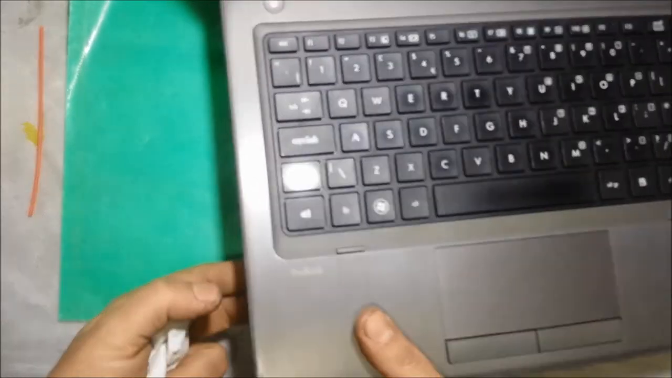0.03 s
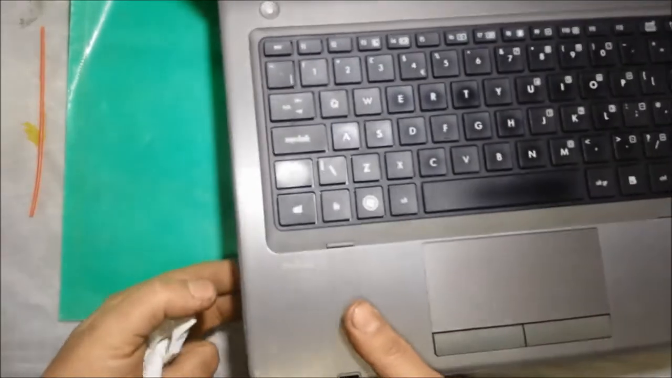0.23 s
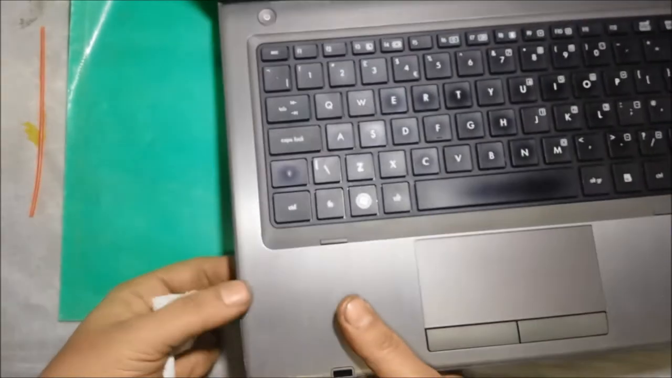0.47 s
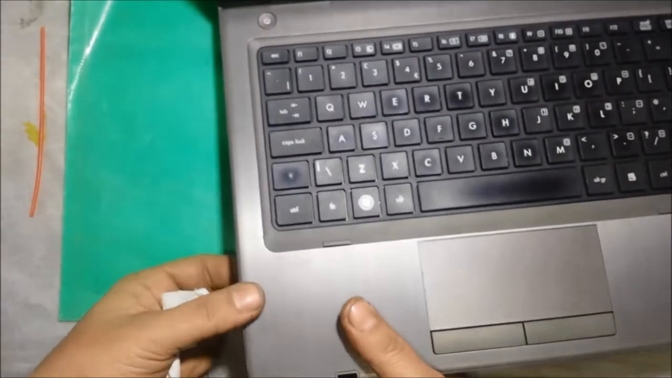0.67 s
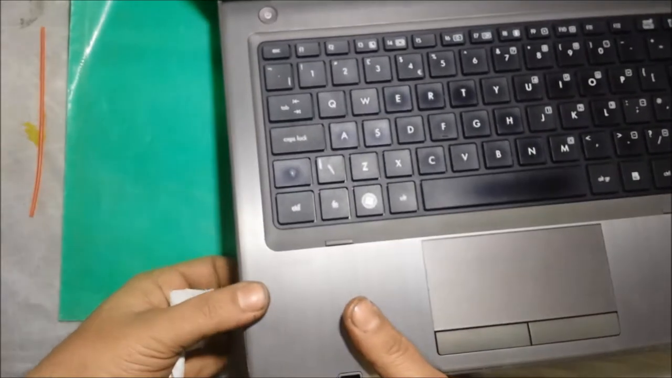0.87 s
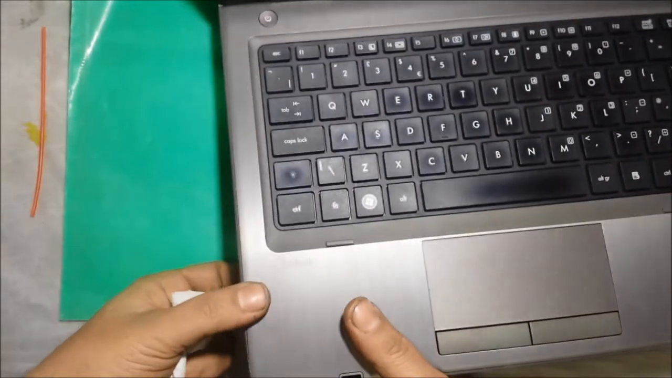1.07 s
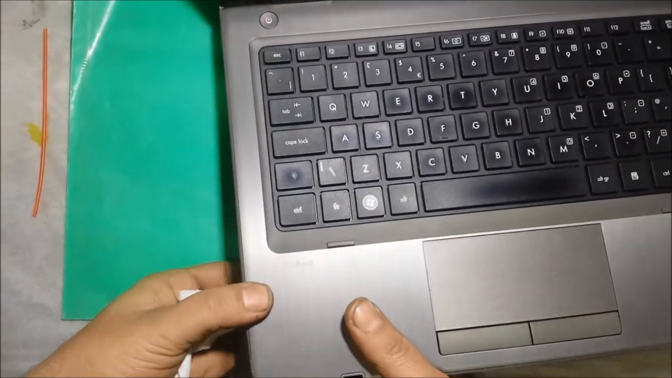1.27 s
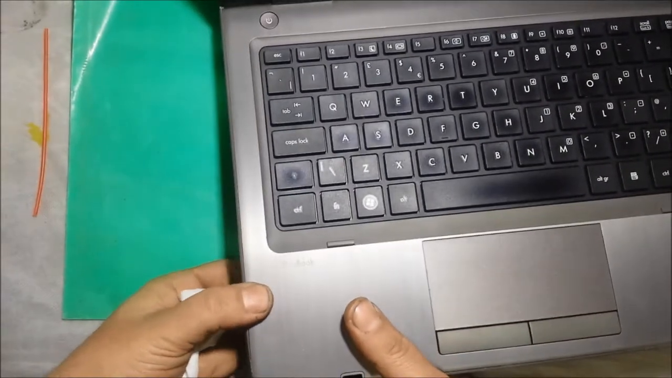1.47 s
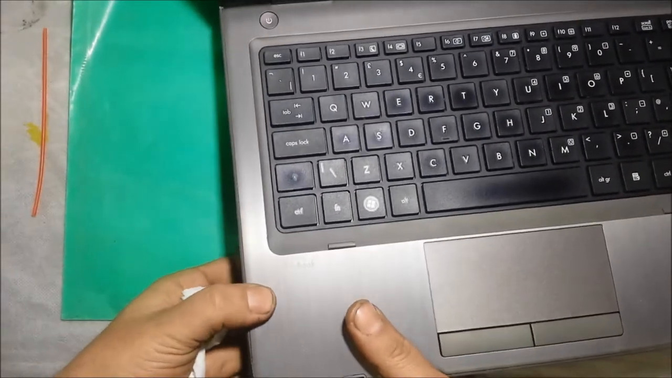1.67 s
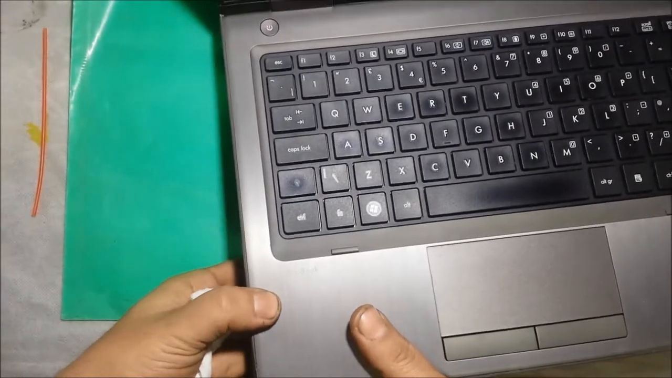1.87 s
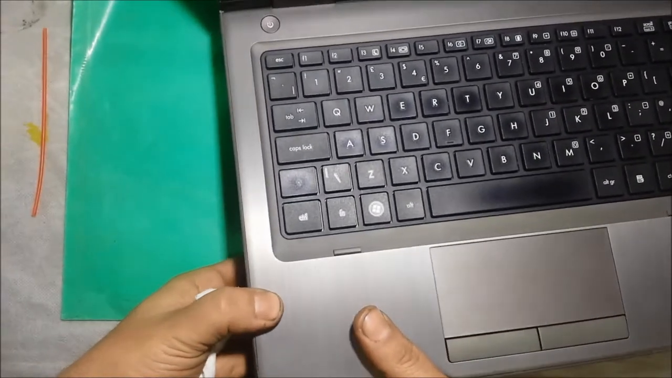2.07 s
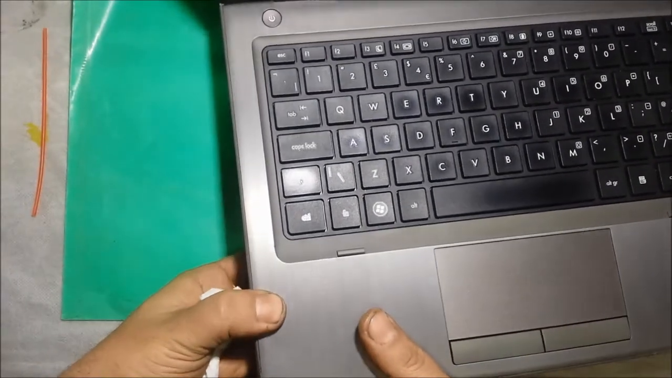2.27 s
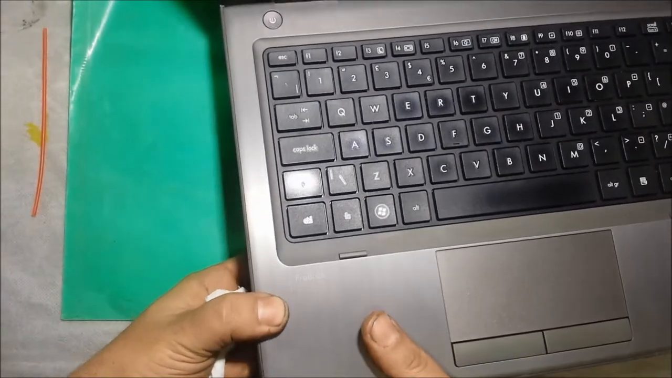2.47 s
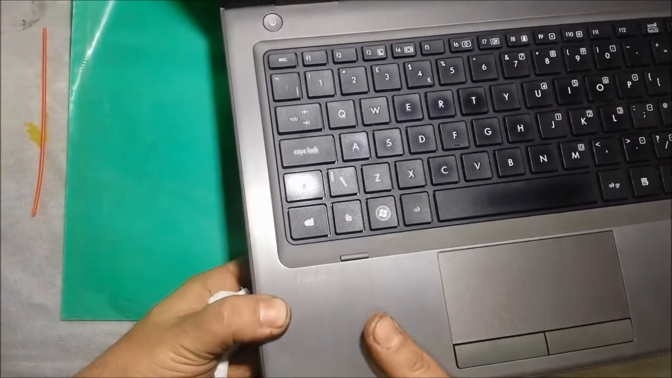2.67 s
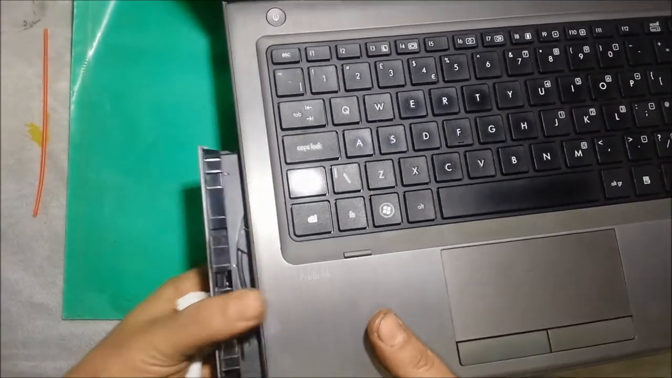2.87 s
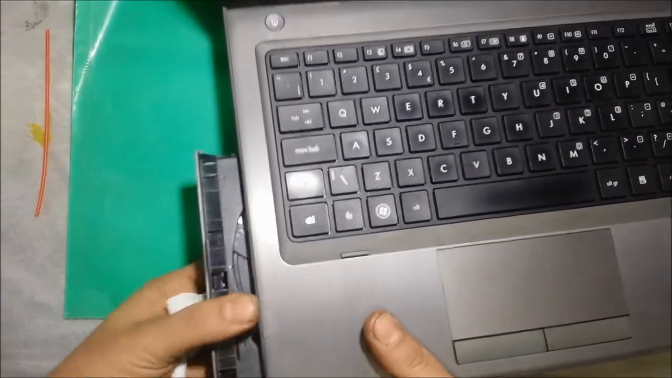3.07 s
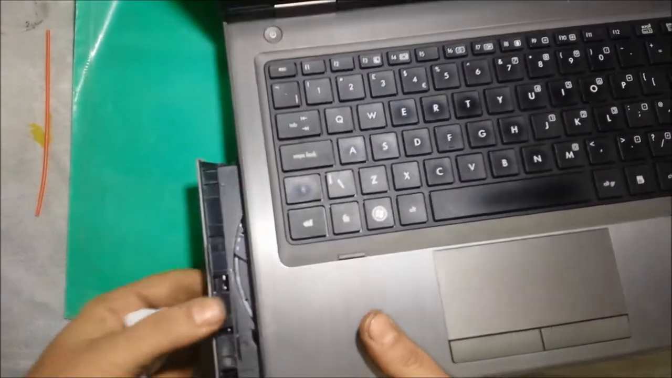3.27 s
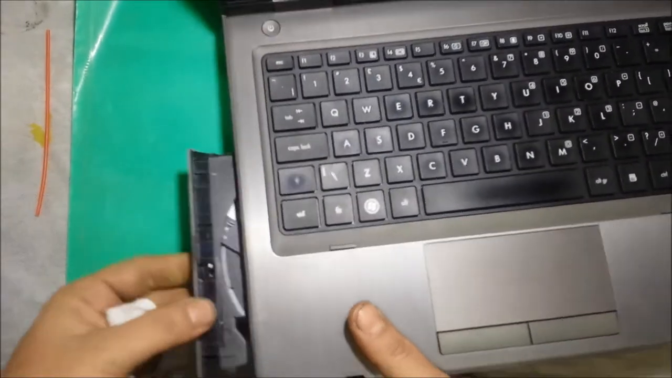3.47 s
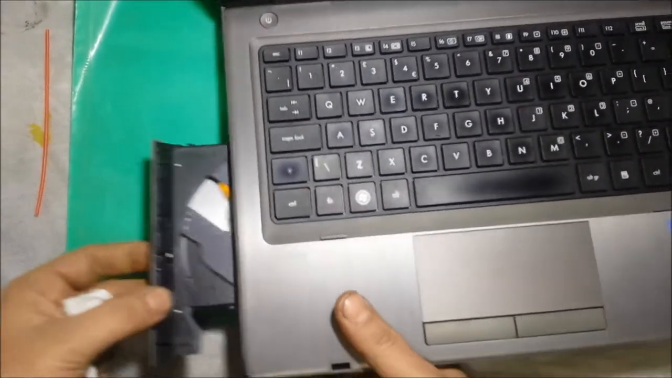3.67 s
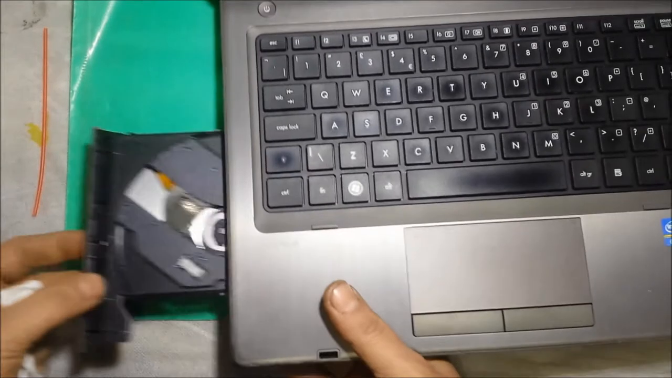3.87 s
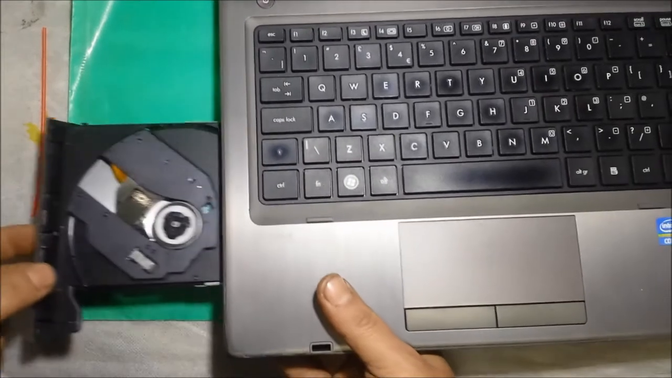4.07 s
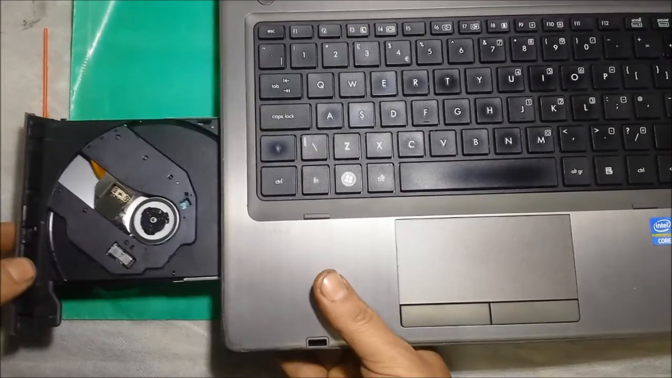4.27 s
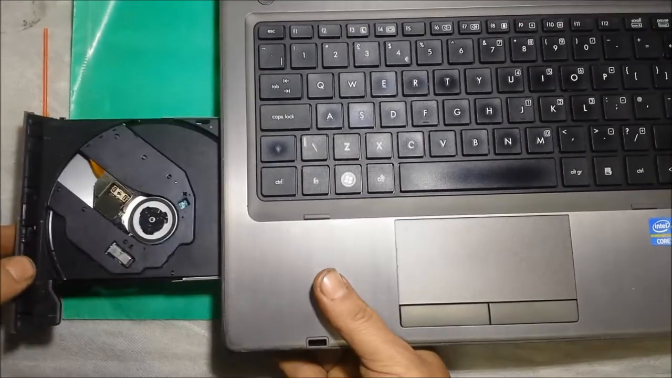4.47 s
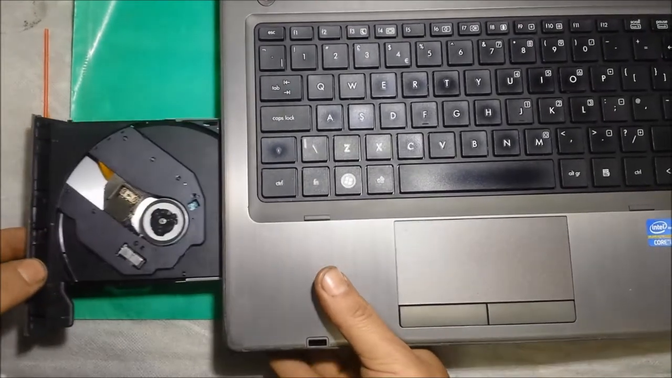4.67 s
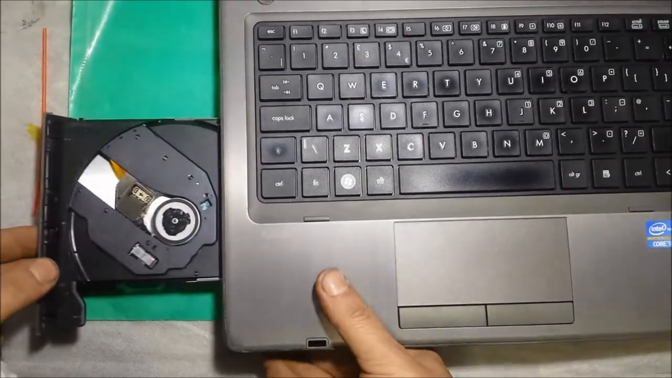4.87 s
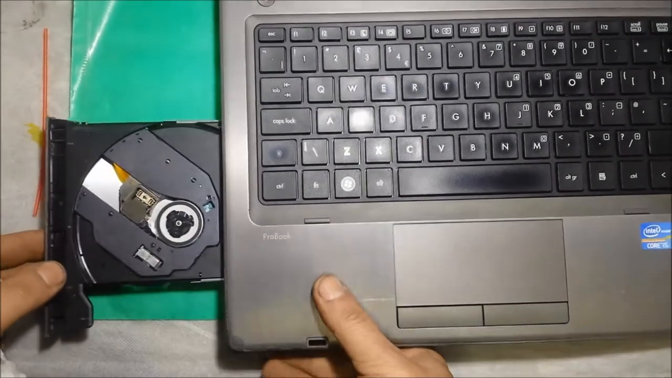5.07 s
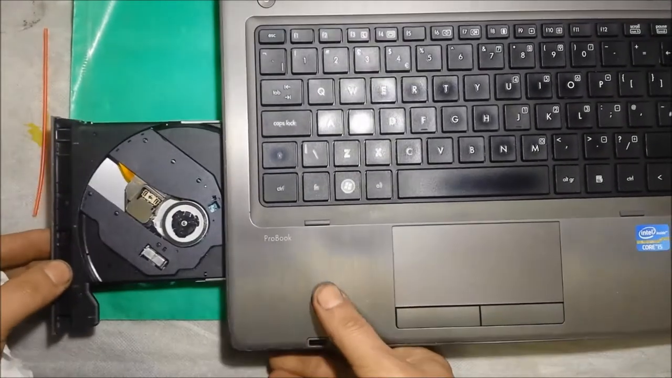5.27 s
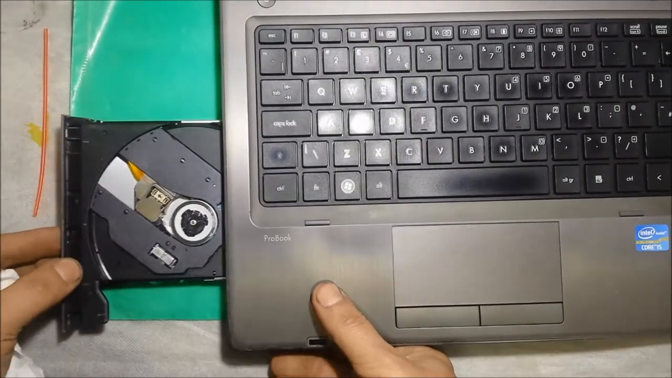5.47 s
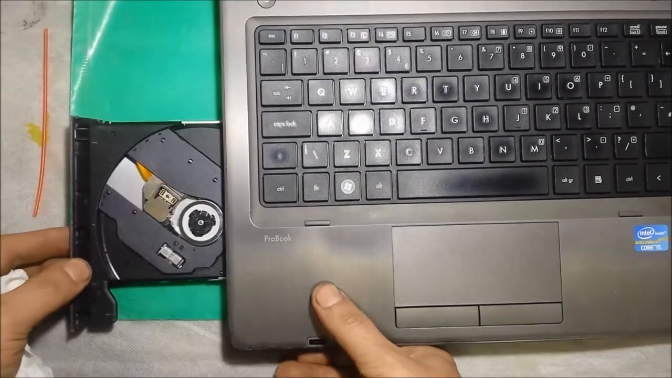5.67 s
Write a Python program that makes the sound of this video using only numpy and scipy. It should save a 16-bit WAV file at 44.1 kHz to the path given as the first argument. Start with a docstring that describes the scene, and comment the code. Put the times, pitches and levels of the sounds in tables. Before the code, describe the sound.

Close plastic clicking and soft knocking in a quiet room, a sharp latch release, a sliding disc tray, and a low rumble swelling at the end.

```python
"""A laptop on a desk is handled close by: a sprung click, soft hollow knocks, then the latch of its optical
drive lets go. The tray is pulled out along its rails, clicks twice at the stop and rubs a little more.
Clicks are short bursts of noise that ring the case, frame and desk; sliding is coloured, grainy noise.
The small room has a faint hiss, and a low rumble, like traffic outside, swells at the end."""
import sys
import numpy as np
from scipy import signal
from scipy.fft import rfft, irfft, next_fast_len
from scipy.io import wavfile
from scipy.ndimage import uniform_filter1d

SR = 44100
rng = np.random.default_rng(int(sys.argv[2]) if len(sys.argv) > 2 else 0)


def unload_wav(signal):
    """Save mono or channel-first audio to the path in sys.argv[1] as 16-bit WAV at rate SR, clipped to [-1, 1]."""
    wavfile.write(
        sys.argv[1],
        SR,
        np.round(np.clip(np.atleast_2d(signal).T, -1, 1) * 32767).astype(np.int16),
    )


N = 252693  # length in samples
TIME = np.arange(N) / SR  # seconds


def gain_of(db):
    """Turns decibels into a factor on the wave."""
    return 10 ** (np.asarray(db) / 20)


def evened(x):
    """Scales a sound to an average (rms) level of 1."""
    return x / np.sqrt(np.mean(x ** 2) + 1e-20)


def read(points, hz):
    """Reads a table between its points, along a logarithmic pitch axis."""
    point_hz, value = np.transpose(points)
    return np.interp(np.log(hz + 1), np.log(point_hz + 1), value)


def add(mix, s, sound):
    """Adds a sound to the mix at the time s, in seconds."""
    part = mix[..., round(s * SR):][..., :sound.shape[-1]]
    part += sound[..., :part.shape[-1]]


def convolve(x, response):
    """Plays x through a response, channel by channel."""
    return signal.fftconvolve(np.atleast_2d(x), np.atleast_2d(response), axes=1)[:, :N]


def colour(x, spectrum, size=4096):
    """Gives x a tone colour; the filter has unit energy and never sounds ahead of its input."""
    hz = abs(np.fft.fftfreq(size, 1 / SR))
    log_gain = np.log(gain_of(read(spectrum, hz)))
    # this choice of phase puts the energy as early as possible
    response = np.exp(signal.hilbert(log_gain).conj())
    taps = np.fft.ifft(response).real[:size // 2]
    return convolve(x, taps / np.linalg.norm(taps))


def ring(modes, contact=0):
    """One second of dying vibration; a long contact time (s) softens its start."""
    t = TIME[:SR]
    waves = sum(gain_of(db - 60 * t / t60) * np.cos(2 * np.pi * hz * t) for hz, db, t60 in modes)
    return waves * (1 - np.exp(-t / contact)) if contact else waves


def noise():
    """White noise at two microphone ports, nearly alike in the bass and mostly unlike in the treble."""
    # likeness of the two ports: pitch_hz, likeness (0 to 1)
    likeness = [(50, 1), (250, 0.95), (700, 0.54), (1600, 0.16), (3500, 0.03), (8000, 0.33), (16000, 0.16)]
    size = next_fast_len(N)
    a, b = rfft(rng.standard_normal((2, size)))
    same = np.clip(read(likeness, np.fft.rfftfreq(size, 1 / SR)), -1, 1)
    second = same * a + np.sqrt(1 - same ** 2) * b
    return irfft(np.array([a, second]), size)[:, :N]


def strokes(rows):
    """Each stroke swells, holds and fades to rest; where strokes overlap, their powers add."""
    power = np.zeros(N)
    for start, attack, hold, release, db in rows:
        up = np.clip((TIME - start) / attack, 0, 1) ** 2
        down = np.clip(1 - (TIME - start - attack - hold) / release, 0, 1)
        power += (gain_of(db) * up * down) ** 2
    return np.sqrt(power)


def friction(rows, spectrum, grain_db, judder_db):
    """Rubbing is countless tiny slips: noise with fine grains and slower judder, under uneven strokes."""
    grains = evened(uniform_filter1d(rng.standard_normal(N), size=30))
    judder = evened(uniform_filter1d(rng.standard_normal(N), size=600))
    slips = evened(noise() * gain_of(grain_db * grains + judder_db * judder))
    return colour(slips * strokes(rows), spectrum)


def self_noise(hiss_db=-69):
    """Even hiss of the two microphones, independent in each."""
    return gain_of(hiss_db) * rng.standard_normal((2, N))


def quiet_room(level_db=-68):
    """The steady, mostly low background of the room is coloured noise."""
    # tone colour of the background: pitch_hz, relative level_db (per Hz)
    quiet_colour = [(20, -4), (40, -4), (62, -1.5), (140, -5), (180, -18), (340, -6.5), (460, -14),
                    (720, -15), (850, -21.5), (1100, -22.5), (4300, -31.5), (6700, -16.5), (10000, -32),
                    (16000, -43)]
    return gain_of(level_db) * colour(noise(), quiet_colour)


def nearness():
    """Level of something that passes far off: it falls with the distance."""
    nearest_s, nearest_db = 5.584, -46.5  # the level is set before the gains in rumble()
    pass_s, loss_db_per_s = 0.31, 1  # time to pass, and extra loss on the way
    away = TIME - nearest_s
    return gain_of(nearest_db - loss_db_per_s * abs(away)) / np.hypot(1, away / pass_s)


def rumble(boom_db=-4, wash_db=-4.0, surge_db=-0.2):
    """A far roar draws near as coloured noise, with an unevenly surging boom in low room resonances."""
    # low room resonances: pitch_hz, relative level_db, t60_s (time to fall by 60 dB)
    boom_modes = [(57.7, -15, .4), (76.3, -2.5, 0.23), (114.7, -8.5, 0.84), (144.5, -7, 0.38),
                  (237, -14.5, 0.21), (304, -5, .2)]
    # tone colour of the roar: pitch_hz, relative level_db (per Hz)
    roar_colour = [(20, -31), (45, -19), (110, -7), (190, -12.5), (235, -9), (340, -15), (520, -13.5),
                   (800, -18.5), (1700, -22.5), (2300, -19.5), (2750, -25.5), (4000, -28), (7000, -25.5),
                   (16000, -39.5)]
    surge = gain_of(surge_db * evened(uniform_filter1d(rng.standard_normal(N), size=4000)))
    boom = surge * evened(convolve(noise(), ring(boom_modes, contact=0.0021)))
    wash = colour(noise(), roar_colour)
    return nearness() * (gain_of(boom_db) * boom + gain_of(wash_db) * wash)


# The contact functions below give rows for clicks(), which adds its own gains to their levels:
# start_s, crack_db, knock_db, knock_hz, desk thud_db, rise_s (build-up), length_s (dying away)


def snaps(knock_hz=1150, rebound_hz=980, rebound_crack_db=2.0, rebound_rise=.0007, rebound_thud_db=-9):
    """A sprung catch lets go with a bright crack that jolts the desk; the freed part rebounds with clacks."""
    # catches: start_s, crack_db, knock_db, rise_s, length_s, rebound_db, thud_db (before the gains in clicks)
    catches = [(0.0808, -7, -23, 0.0046, 0.0037, -33.5, -55),
               (2.8686, -5, -19.5, .00058, 0.0021, -21.5, -43.5),
               (2.8893, -9, -21.5, 0.003, .004, -31, -30)]
    # the two rebounds: delay_s, length_s
    rebounds = [(.0048, .002), (.0086, 0.0041)]
    for s, crack_db, knock_db, rise, length, rebound_db, thud_db in catches:
        yield s, crack_db, knock_db, knock_hz, thud_db, rise, length
        for delay, rebound_length in rebounds:
            rebound_crack = rebound_db + rebound_crack_db
            rebound_thud = thud_db + rebound_thud_db
            yield s + delay, rebound_crack, rebound_db, rebound_hz, rebound_thud, rebound_rise, rebound_length


def spring(start_s=.083):
    """A small steel part sings on after the first click, as a sum of dying tones."""
    # its tones: pitch_hz, level_db, t60_s (time to fall by 60 dB)
    spring_modes = [(623, -46, 0.86), (1520, -63.5, 0.88), (1880, -58, 0.65), (3555, -36, 0.099),
                    (5889, -66, .25), (6100, -55, 0.18), (8240, -60.5, 0.282)]
    out = np.zeros(N)
    add(out, start_s, ring(spring_modes, contact=0.0013))
    return out


def ticks(knock_db=-22, knock_hz=1400, thud_db=-28, rise=.0003, length=0.0012):
    """Thin, tiny ticks of the plastic that barely stir the case."""
    # ticks: start_s, level_db (before the gains in clicks)
    tick_rows = [(.1755, -49), (.817, -57), (2.0997, -52), (4.655, -50)]
    return [(s, db, db + knock_db, knock_hz, db + thud_db, rise, length) for s, db in tick_rows]


def fingertip():
    """A fingertip creeps over the case: very grainy rubbing of skin."""
    # strokes: start_s, attack_s, hold_s, release_s, level_db
    creeps = [(.42, 0.526, 0.099, 0.046, -65), (1.3, 0.27, 0.17, 0.22, -69)]
    # tone colour of skin on the case: pitch_hz, relative level_db (per Hz)
    skin_colour = [(50, -25), (140, 9.5), (250, -3), (450, -8), (720, 1), (950, -11), (1600, -13),
                   (3000, -17.5), (7000, -12.5), (15000, -30)]
    return friction(creeps, skin_colour, grain_db=3.0, judder_db=0.4)


def button(crack_db=-1.0, knock_hz=900, length=.004, settle_s=.012, settle_db=-10, settle_hz=750,
           settle_crack_db=2.5, settle_length=0.0045):
    """The eject button clicks under the finger, then settles more softly and a little lower."""
    # presses: start_s, level_db, rise_s, desk thud_db (before the gains in clicks)
    presses = [(1.0143, -46, 0.00046, -48.5), (1.442, -49.5, 0.0032, -51), (2.7166, -47, 0.0014, -57.5)]
    for s, db, rise, thud_db in presses:
        yield s, db + crack_db, db, knock_hz, thud_db, rise, length
        soft_db = db + settle_db
        yield (s + settle_s, soft_db + settle_crack_db, soft_db, settle_hz,
               thud_db + settle_db, rise, settle_length)


def creak(count=5, loudest=2.8, fade_db=-0.7, knock_hz=760, hz_per_db=22, crack_db=-16, thud_db=-8,
          rise=0.00225, length=0.0052):
    """The case creaks under the grip: dull, even-paced slips swell and fade, the weaker ones higher."""
    start_s, slip_s, creak_db = 1.1865, 0.011, -45.5  # start, time between slips, level of the swell's top
    for k in range(count):
        below_db = fade_db * (k - loudest) ** 2
        db = creak_db + below_db
        slip_hz = knock_hz - hz_per_db * below_db
        yield start_s + k * slip_s, db + crack_db, db, slip_hz, db + thud_db, rise, length


def knocks(crack_db=-15, thud_db=-19, rise_share=0.25):
    """Soft, hollow knocks: a finger or loose plastic part bumps the case, with hardly any crack."""
    # knocks: start_s, level_db (before the gains in clicks), centre pitch_hz, length_s
    knock_rows = [(1.391, -52.5, 730, 0.0026), (1.4164, -49.5, 790, .007), (1.536, -55, 970, 0.0027),
                  (2.931, -43, 1120, .006), (3.117, -43, 1100, 0.0043), (3.326, -54, 1100, 0.0028),
                  (4.509, -56, 381, 0.0117), (4.977, -50.5, 640, .0024), (5.426, -49.5, 380, 0.0119)]
    return [(s, db + crack_db, db, hz, db + thud_db, rise_share * length, length)
            for s, db, hz, length in knock_rows]


def rails():
    """The tray shifts, is pulled, speeds up and is later eased a little: strokes of noise along its rails."""
    # strokes: start_s, attack_s, hold_s, release_s, level_db
    slides = [(2.25, .17, .06, 0.13, -72), (3.08, 0.049, 0.091, 0.33, -62), (3.42, 0.32, .3, .08, -49),
              (3.84, 0.025, 0.19, 0.12, -47.5), (4.56, 0.2, .01, .38, -55)]
    # tone colour of the tray on its rails: pitch_hz, relative level_db (per Hz)
    rail_colour = [(60, -40), (150, -15), (600, -4), (1100, -9.5), (1600, -2), (2450, -7.5), (3100, -5),
                   (3900, -4.5), (4700, -3), (5800, -3), (6950, 2.5), (8300, -5.5), (10000, -11.5),
                   (15500, -18.5)]
    return friction(slides, rail_colour, grain_db=1.5, judder_db=1.2)


def carried_body():
    """The hand moving the tray makes the laptop rumble on the desk: low, juddering friction."""
    # strokes: start_s, attack_s, hold_s, release_s, level_db
    carries = [(2.85, 0.11, 0.17, 0.52, -60.5), (3.3, 0.59, 0.44, 0.1, -58.5),
               (5.37, 0.058, .02, 0.048, -48.5)]
    # tone colour of the laptop on the desk: pitch_hz, relative level_db (per Hz)
    body_colour = [(30, -11.5), (75, 0), (140, -6.5), (330, -7), (700, -13.5), (2000, -25), (8000, -44)]
    return friction(carries, body_colour, grain_db=1.5, judder_db=3.4)


def rattles(knock_db=-8, knock_hz=1300, thud_db=-14, rise_share=0.58):
    """The loose tray chatters brightly in its rails; a longer rattle also builds up more slowly."""
    # rattles: start_s, level_db (before the gains in clicks), length_s
    rattle_rows = [(3.0772, -45, 0.0027), (3.089, -39, 0.0067), (3.097, -33, 0.0086), (3.19, -39, 0.0066),
                   (3.222, -45, 0.0085), (3.861, -33.5, 0.003), (4.344, -45.5, 0.0042)]
    return [(s, db, db + knock_db, knock_hz, db + thud_db, rise_share * length, length)
            for s, db, length in rattle_rows]


def scrape():
    """The rails bind and scrape on the second half of the way: two short, bright strokes of friction."""
    # strokes: start_s, attack_s, hold_s, release_s, level_db
    binds = [(3.845, 0.045, .005, 0.047, -41), (3.895, 0.047, .008, 0.032, -38)]
    # tone colour of binding rails: pitch_hz, relative level_db (per Hz)
    scrape_colour = [(200, -30), (1500, -7), (2500, -4), (3100, 2.5), (3800, -12), (4650, 11), (5400, 3),
                     (6200, 0), (7000, 3), (9000, -5), (15500, -17)]
    return friction(binds, scrape_colour, grain_db=1.5, judder_db=0.2)


def plastic_rub():
    """Plastic rubs on plastic around the stop and after it: one stroke of fine friction."""
    # strokes: start_s, attack_s, hold_s, release_s, level_db
    drags = [(4.0, .12, .02, 0.3, -45.5)]
    # tone colour of plastic on plastic: pitch_hz, relative level_db (per Hz)
    rub_colour = [(60, -8), (150, -13), (600, -4.5), (900, -8), (1500, -3), (2900, -8), (4700, -6),
                  (6900, -4), (8400, -8), (10000, -15.5), (15500, -20)]
    return friction(drags, rub_colour, grain_db=1.1, judder_db=0.6)


def stops(knock_hz=2100, thud_db=-39, rise=0.00034, length=0.0022):
    """Hard, short clicks as the two rails of the light tray reach their stops."""
    # stops: start_s, crack_db, knock_db (before the gains in clicks)
    stop_rows = [(4.0304, -20, -27.5), (4.0730, -17, -34)]
    return [(s, crack_db, knock_db, knock_hz, knock_db + thud_db, rise, length)
            for s, crack_db, knock_db in stop_rows]


def clicks(contacts, case_db=-7, frame_db=-23, crack_gain_db=3.0, knock_gain_db=4):
    """Each contact is a brief rattling burst; its blow rings the case, the frame and the desk."""
    # modes of the case, the drive's sheet-metal frame and the desk:
    # pitch_hz, relative level_db, t60_s (time to fall by 60 dB)
    case_modes = [(480, -34.5, 0.11), (652, 6.5, 0.067), (704, -1, 0.099), (863, -7.5, 0.033),
                  (1060, -24, 0.099), (1212, -9, 0.13), (1420, -2.5, 0.062), (1580, -19, 0.032),
                  (1720, -2, 0.085), (2010, -14, 0.062), (2230, -17, 0.081), (2900, -8, .05)]
    frame_modes = [(3260, -6.5, 0.071), (4780, -9, .05), (5100, -13, .07), (6040, -6, 0.1083),
                   (6850, -28, .08), (6450, -10, 0.0807), (7060, -10, .08), (7560, -7, .08),
                   (8400, -5, 0.098)]
    desk_modes = [(127, 0.5, .12), (138, 1, 0.11), (235, 5.5, 0.031), (339.4, -6.5, 0.14)]
    # tone colour of snapping and rattling plastic: pitch_hz, relative level_db (per Hz)
    crack_colour = [(100, -60), (600, -20.5), (2000, -15), (3200, -7.5), (4050, -9), (4900, -5), (6000, -7),
                    (6900, 3), (7500, -5), (8500, -4.5), (9500, -16.5), (12000, -17.5), (15500, -27)]
    # tone colour of a knock: factor on the centre pitch, relative level_db (per Hz)
    knock_colour = [(.05, -26), (.2, -11.5), (.36, -14.5), (.5, -7.5), (.68, 1), (1, -1), (1.75, -1),
                    (2.3, -7.5), (3.2, -17.5), (6, -31), (15, -44.5)]
    crack, hollow, chatter = np.zeros((2, N)), np.zeros((2, N)), noise()
    frame_blows, desk_blows = np.zeros((2, N))
    t = TIME[:SR // 12]
    case_hz = np.transpose(case_modes)[0]
    case_rings = np.array([ring([mode], contact=0.00075)[:SR // 4] for mode in case_modes])
    for s, crack_db, knock_db, knock_hz, thud_db, rise, length in contacts:
        at = round(s * SR)
        burst = (1 - np.exp(-t / rise)) * np.exp(-t / length)
        add(crack, s, gain_of(crack_db) * burst * chatter[:, at:at + len(t)])
        spectrum = [(knock_hz * factor, db) for factor, db in knock_colour]
        start = rng.integers(N - len(t))  # the knock takes its noise from a random place
        thump = colour(burst * chatter[:, start:start + len(t)], spectrum)
        add(hollow, s, gain_of(knock_db + knock_gain_db) * thump)
        peak = at + np.argmax(burst)  # the blow lands at the height of the rattle
        # the knock's colour decides how strongly each case mode rings
        mode_gains = gain_of(knock_db + case_db + read(spectrum, case_hz))
        add(hollow, peak / SR, mode_gains @ case_rings * burst.max())
        frame_blows[peak] += gain_of(crack_db + frame_db) * burst.max()
        desk_blows[peak] += gain_of(thud_db)
    frame = convolve(frame_blows, ring(frame_modes, contact=0.00034))
    desk = convolve(desk_blows, ring(desk_modes, contact=0.008))
    return gain_of(crack_gain_db) * colour(crack, crack_colour) + hollow + frame + desk


def room(x, early_db=-9.5, early_t60=0.1, late_db=-21, delay=0.0031):
    """Quick reflections from the desk and things on it, then the faint tail of the room, as dying noise."""
    # tail of the room: pitch_hz, t60_s (time to fall by 60 dB)
    tail_t60 = [(100, .35), (500, 0.28), (2000, 0.77), (7000, 0.41), (15000, 0.96)]
    t = TIME[:SR]
    onset = 1 - np.exp(-(t / delay) ** 2)
    early = noise()[:, :SR] * onset * gain_of(-60 * t / early_t60)
    hz, frame_s, z = signal.stft(noise()[:, :SR], SR, nperseg=256)
    fading = z * gain_of(-60 * frame_s / read(tail_t60, hz)[:, None])  # each pitch dies at its own pace
    late = onset * signal.istft(fading, SR, nperseg=256)[1][:, :SR]
    response = gain_of(early_db) * evened(early) + gain_of(late_db) * evened(late)
    return convolve(x, response / np.sqrt(SR))


def ports(x, shade=1.0):
    """The left port is screened from the treble and hears the upper middle range a little late."""
    # level between the ports: pitch_hz, left minus right level_db (scaled by shade)
    port_shade = [(100, .3), (700, 1.7), (1700, 2.8), (2600, 0), (3600, -5), (5000, -12), (7000, -19),
                  (9000, -17), (12000, -13), (16000, -12)]
    # timing between the ports: pitch_hz, phase by which left leads (radians)
    port_lead = [(300, 0.5), (800, -0.2), (1300, 0.2), (2000, -1.14), (3000, -3.5)]
    size = next_fast_len(N + SR)
    hz = np.fft.rfftfreq(size, 1 / SR)
    ratio = gain_of(shade * read(port_shade, hz))
    left, right = ratio * np.exp(1j * read(port_lead, hz)), np.ones(len(hz))
    gains = np.array([left, right]) * np.sqrt(2 / (1 + ratio ** 2))  # the two gains keep the same total power
    return irfft(rfft(x, size) * gains, size)[:, :N]


def scene():
    """The laptop is near and to one side; the background is less screened between the ports."""
    contacts = [*snaps(), *ticks(), *button(), *creak(), *knocks(), *rattles(), *stops()]
    hits = clicks(contacts) + spring()
    sliding = fingertip() + rails() + carried_body() + scrape() + plastic_rub()
    near = ports(hits, shade=1.18) + ports(sliding, shade=0.99)
    reflections = ports(room(hits + sliding), shade=1.0)
    background = ports(quiet_room() + rumble(), shade=0.5)
    return near + reflections + background + self_noise()


def record(dry, bass_hz=45, edge_hz=15800, full_scale=1.0):
    """The recorder sheds the deep bass, rounds off the highest peaks and cuts the top treble."""
    bass_cut = signal.butter(2, bass_hz, "highpass", fs=SR, output="sos")
    thinned = signal.sosfilt(bass_cut, dry)
    rounded = full_scale * np.tanh(thinned / full_scale)  # the input saturates towards full_scale
    treble_cut = signal.firwin(255, edge_hz, window=("kaiser", 8), fs=SR)
    return signal.oaconvolve(rounded, treble_cut[None], "same")


dry = scene()
out = record(dry)
unload_wav(out)
```